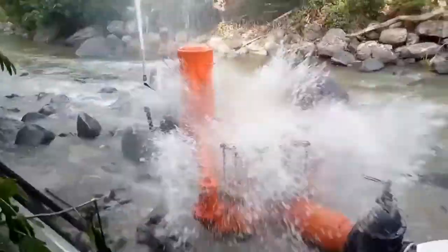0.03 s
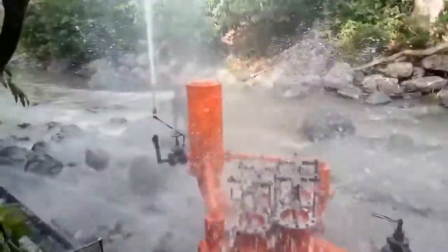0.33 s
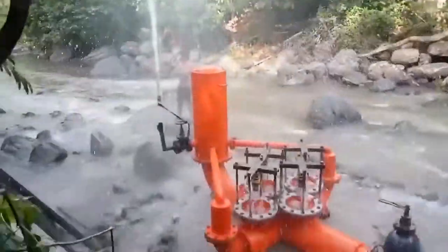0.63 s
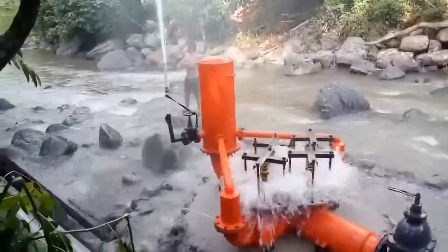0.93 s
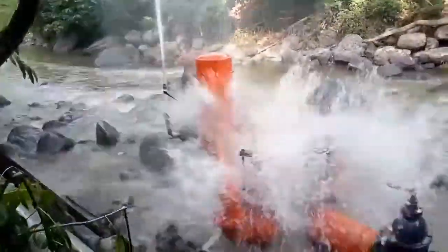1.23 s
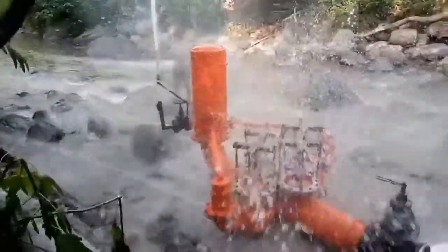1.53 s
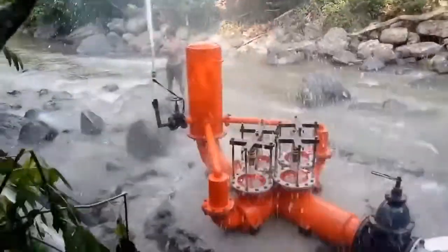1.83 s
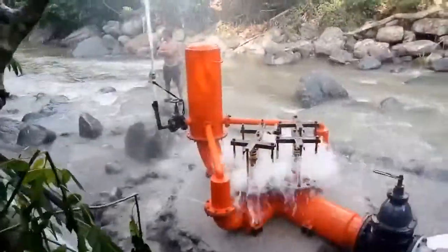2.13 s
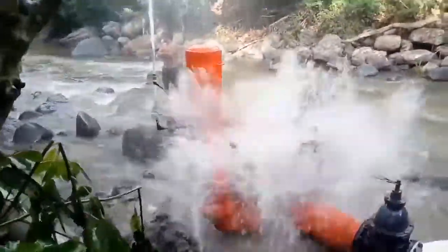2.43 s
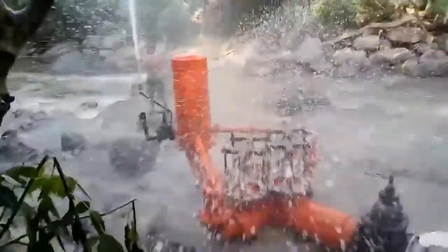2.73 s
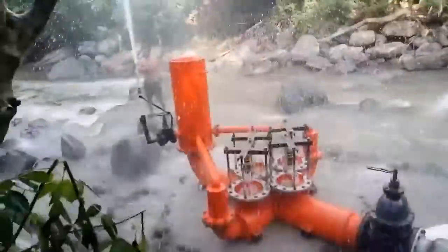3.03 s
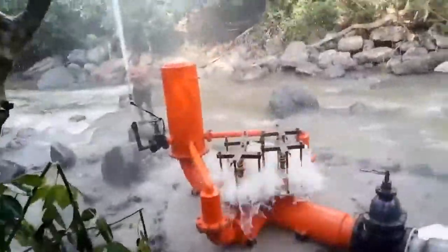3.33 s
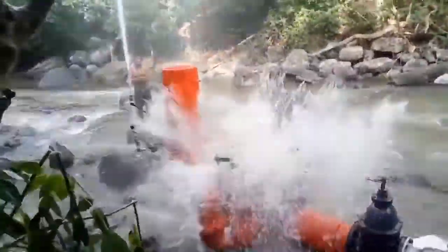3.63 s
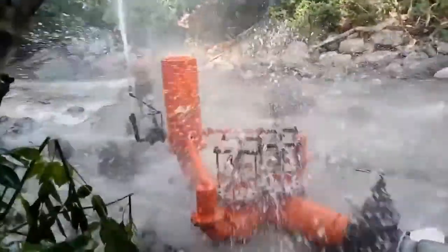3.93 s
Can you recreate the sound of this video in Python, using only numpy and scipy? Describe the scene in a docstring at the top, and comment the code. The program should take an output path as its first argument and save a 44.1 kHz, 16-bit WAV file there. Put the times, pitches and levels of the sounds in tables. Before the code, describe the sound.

Water gushes and hisses from a ram pump whose valves slam shut in a steady cycle.

```python
"""Gushing water surges into a steel slam: a big hydraulic ram pump, cycling about every 1.2 s.
The jets from its open waste valves swell as they close; the plate hits its seat and rings the body.
The water column recoils, the valves clatter open, the drive pipe rumbles and spray rains down.
A river rushes behind it. Gain control ducks the level at each slam."""
import sys
import numpy as np
from scipy import signal
from scipy.fft import rfft, irfft, next_fast_len
from scipy.io import wavfile
from scipy.ndimage import uniform_filter1d, map_coordinates

SR = 44100
rng = np.random.default_rng(int(sys.argv[2]) if len(sys.argv) > 2 else 0)


def file_out(sig):
    """Save sig as 16-bit WAV at sys.argv[1]."""
    # one column per channel
    cols = np.atleast_2d(sig).T
    # limit, then scale
    lim = np.clip(cols, -1, 1)
    pcm = np.round(lim * 32767).astype(np.int16)
    wavfile.write(sys.argv[1], SR, pcm)


N = 176400
T = np.arange(N) / SR

# Valve closures. Each row: start in seconds, slam and surge levels in relative dB,
# rebound lag in seconds, rebound level in dB against the slam.
CLOSURES = [(0.184, -11.5, -15, 0.0048, -7), (1.3940, -12.5, -13, 0.0049, -1),
            (2.6037, -12.5, -14.5, 0.00657, -7), (3.8131, -12, -12.5, .0078, -3)]
# Valve plate modes. Each row: frequency in Hz, level in dB, T60 in seconds.
PLATE_MODES = [(221, -15.5, 0.078), (407, -13.5, 0.029), (559, 0.5, 0.032), (958, -3.5, 0.058),
               (1060, -7, 0.022), (1222, -10, 0.032), (1528, -15.5, 0.091), (2017, -14.5, 0.05)]
# Water hammer and wash spectra. Each row: frequency in Hz, level in dB.
HAMMER_SPECTRUM = [(50, -54), (120, -35), (200, 8), (300, -43), (560, -26.5), (720, -9), (1000, 1),
                   (1500, 3.5), (2100, -5), (3000, -1), (9000, -34)]
WASH_SPECTRUM = [(150, -9), (400, 7), (600, -12), (800, 0), (1050, 4), (1400, -11), (3000, -39)]

def slams(chatter_s=0.011, chatter_db=-11, tick_loss_db=1):
    """The plate hits its seat, rebounds and chatters, with water hammer and a fading wash."""
    contacts = []
    for s, db, _, lag_s, rebound_db in CLOSURES:
        ticks_s = s + lag_s + chatter_s * np.cumsum(1 + 0.158 * rng.uniform(-1.03, 1, size=5))
        contacts += [(s, db), (s + lag_s, db + rebound_db)]
        contacts += [(tick, db + chatter_db - tick_loss_db * k) for k, tick in enumerate(ticks_s)]
    plate = amp(5) * struck(PLATE_MODES, contacts, attack_s=0.00023)
    hammer = sum(amp(db - 5) * burst(s + 0.0055, 0.0056, 0.15) for s, db, *_ in CLOSURES)
    wash = sum(amp(db - 17) * burst(s + 0.006, 0.026, 0.74) for s, db, *_ in CLOSURES)
    return plate + hammer * rush(HAMMER_SPECTRUM) + wash * patter(WASH_SPECTRUM, per_s=990)


# Closing surge spectrum. Each row: frequency in Hz, level in dB.
SURGE_SPECTRUM = [(40, -30), (90, -4), (125, -5), (180, -6.5), (240, 1), (340, 2), (460, 5), (650, -1),
                  (1000, -2.5), (2000, -3), (5000, -16)]
# Seating knock modes. Each row: frequency in Hz, level in dB, T60 in seconds.
SEATING_MODES = [(226.5, 2.5, 0.093), (337, -4.5, 0.066), (470, 2, 0.06)]

def surge(lead_s=0.017, knock_lead_s=0.0205, t60_s=0.23):
    """Jets swell as the valves close; water squeezes through the gap with a low knock."""
    jet_hz_db = [(200, -49), (500, -3), (1000, 4.5), (2200, 0.5), (6000, -50)]
    jets = amp(-32) * sum(burst(s - lead_s, 1.0, t60_s) for s, *_ in CLOSURES)
    swell = sum(amp(db - 4.5) * burst(s - lead_s, 0.026, t60_s) for s, _, db, *_ in CLOSURES)
    seatings = [(s - knock_lead_s, db - 1) for s, _, db, *_ in CLOSURES]
    knock = struck(SEATING_MODES, seatings, attack_s=0.0028)
    return jets * rush(jet_hz_db, patchy_db=7) + swell * rush(SURGE_SPECTRUM, patchy_db=3.5) + knock


# Recoil blows. Each row: time in seconds, relative level in dB, rise in seconds,
# rattle T60 in seconds, bass offset in dB.
RECOIL_BLOWS = [(.556, -26.5, 0.012, 0.24, 8.5), (0.615, -14.5, 0.026, 0.24, 2),
                (.639, -18, 0.022, 0.18, 3), (0.749, -23.5, 0.11, 0.092, -5), (1.774, -24, 0.019, 0.11, 3),
                (1.822, -18, 0.044, 0.29, -1), (1.843, -16.5, 0.034, 0.22, 1), (1.866, -24.5, .012, .15, 9),
                (1.954, -24, 0.055, 0.1, -1), (2.972, -24, 0.02, 0.059, 3.5),
                (3.023, -19.5, 0.034, .15, -5), (3.037, -20, 0.015, .12, 4), (3.051, -16.5, 0.026, 0.2, 2),
                (3.081, -28.5, .012, 0.19, 8), (3.157, -28, 0.072, 0.13, -2.5),
                (3.977, -24.5, 0.051, .12, -16)]
# Pipe knock modes. Each row: frequency in Hz, level in dB, T60 in seconds.
PIPE_MODES = [(181.3, 1, 0.12), (346.4, -7.5, 0.14), (456, -3, 0.069)]
# Rattle and thud spectra. Each row: frequency in Hz, level in dB.
RATTLE_SPECTRUM = [(200, -46), (330, -22), (460, -11), (560, -9), (700, -6.5), (900, -4.5), (1100, -3),
                   (1300, -8.5), (1600, -5), (2200, -10), (4000, -13.5), (9000, -19.5)]
THUD_SPECTRUM = [(40, -35), (80, -9), (125, -9), (190, -1), (240, 1.5), (300, -6), (360, -10), (450, -0.5),
                 (600, -3.5), (1500, -19)]

def recoil(thud_lag_s=0.0014, thud_t60_ratio=1.55):
    """The column recoils: valves drop open with a clank, a pipe knock, a rattle and a dull thud."""
    rattle_power = thud_power = 0
    clanks, knocks = [], []
    for s, db, rise_s, t60_s, bass_db in RECOIL_BLOWS:
        rattle_power += (amp(db) * burst(s, rise_s, t60_s)) ** 2
        thud_shape = burst(s + thud_lag_s, rise_s, t60_s * thud_t60_ratio)
        thud_power += (amp(db + bass_db - 9) * thud_shape) ** 2
        clanks.append((s, db - 3))
        knocks.append((s, db + bass_db - 3))
    clank = struck(PLATE_MODES, clanks, attack_s=0.001)
    knock = struck(PIPE_MODES, knocks, attack_s=0.002)
    rattle = amp(-1 + 0.44 * wobble(150)) * np.sqrt(rattle_power) * rush(RATTLE_SPECTRUM)
    thud = np.sqrt(thud_power) * rush(THUD_SPECTRUM, patchy_db=-1)
    return clank + knock + rattle + thud


# Stem drops. Each row: start in seconds, pitch in Hz, level in dB, T60 in seconds.
STEM_DROPS = [(0.612, 1120, -2.5, 0.029), (1.844, 886, -12, 0.075), (1.849, 665, -10, 0.032),
              (1.943, 1070, -24, 0.18), (2.745, 860, -23, 0.17), (3.050, 1006, -7, .04),
              (3.145, 1650, -24, 0.14)]

def stem_clinks(attack_s=0.0043, jitter_rad=0.27):
    """Valve stems drop with short, unsteady metallic notes."""
    out = np.zeros(N)
    for s, hz, db, t60_s in STEM_DROPS:
        t = np.maximum(T - s, 0)
        envelope = amp(db - 60 * t / t60_s) * (1 - np.exp(-t / attack_s))
        out += envelope * np.sin(2 * np.pi * hz * t + jitter_rad * wobble(250))
    return out


# Steel body modes. Each row: frequency in Hz, level in dB, T60 in seconds.
BODY_MODES = [(475, 0, 0.5), (594, -1.5, 0.46), (851, -3, 0.54), (930, 1.5, 0.41), (949, 2.5, 0.41),
              (1018, -5, 0.69), (1472, -6, 0.77), (2220, -5, 0.6)]

def body_ring(level_db=-36, recoil_db=-6):
    """The steel body rings on, wide in stereo, after every slam and recoil blow."""
    blows = [(s, db) for s, db, *_ in CLOSURES] + [(s, db + recoil_db) for s, db, *_ in RECOIL_BLOWS]
    stereo_pair = [struck(BODY_MODES, blows, attack_s=0.018, scatter=0.00483) * amp(1.8 * wobble(40))
                   for _ in range(2)]
    return amp(level_db) * spread(np.array(stereo_pair), np.ones_like)


# Valve outflow, in three runs. Each row: time in seconds, gush and mist levels in relative dB.
OUTFLOW = [
    [(0.33, -28.5, -27.5), (0.4, -27.5, -29.5), (0.57, -27.5, -27.5), (0.658, -28, -31.5),
     (0.696, -26.5, -26.5), (1.072, -29, -28), (1.36, -27, -27)],
    [(1.55, -29.5, -28), (1.676, -26.5, -26), (1.72, -28.5, -28), (1.802, -26.5, -27),
     (2.068, -28.5, -26.5), (2.56, -27.5, -27.5), (2.57, -30.5, -29.5)],
    [(2.76, -29.5, -28), (2.972, -27, -28.5), (3.026, -27.5, -31), (3.332, -29, -27), (3.358, -30.5, -28.5),
     (3.384, -28.5, -27), (3.78, -29, -28)],
]
# Gush and mist spectra. Each row: frequency in Hz, level in dB.
GUSH_SPECTRUM = [(800, -55), (1800, -14.5), (2600, -4), (3600, -0.5), (5000, 0), (6500, 0.5), (7400, -4),
                 (8100, -10), (10000, -6), (16000, -18)]
MIST_SPECTRUM = [(6000, -40), (8200, -8.5), (9000, -5), (10200, -2), (11200, 4), (12200, 2.5), (12900, -1),
                 (14300, -0.5), (14800, 5), (15800, -7.5)]

def valve_gush():
    """Water churns out of the waste valves, with drops and a hiss of fine mist."""
    times_s, *levels = np.transpose(np.concatenate(OUTFLOW))
    gush_db, mist_db = [np.interp(T, times_s, level) for level in levels]
    churn_db = 0.55 * wobble(21.05)
    gush = amp(gush_db + 6 + churn_db + 0.71 * wobble(11)) * rush(GUSH_SPECTRUM)
    drops = amp(gush_db - 4) * patter(GUSH_SPECTRUM, per_s=410)
    mist = amp(mist_db + 5.5 + churn_db + 0.38 * wobble(7.8)) * rush(MIST_SPECTRUM)
    return gush + drops + mist


def falling_spray(delay_s=0.25, rise_s=0.53, t60_s=0.96, level_db=-31):
    """Water thrown up by each slam rains back down."""
    rain_hz_db = [(200, -21), (450, -15), (800, -1), (2000, 1), (6000, -17), (12000, -26)]
    shower = sum(burst(s + delay_s, rise_s, t60_s) for s, *_ in CLOSURES)
    return amp(level_db) * shower * patter(rain_hz_db, per_s=2000)


# Column swings. Each row: peak in seconds after the slam, level in dB, rise and T60 in seconds.
COLUMN_SWINGS = [(.17, -39.5, 0.24, 0.99), (.44, -31, 0.24, 1)]
# Rumble offset in dB, one per cycle.
CYCLE_RUMBLE_DB = [-1.5, -2.5, 1.5, 2]
# Drive pipe spectrum. Each row: frequency in Hz, level in dB.
RUMBLE_SPECTRUM = [(30, -33), (60, -34), (85, -27), (120, 6), (160, -4.5), (230, -3), (320, -30),
                   (800, -21)]

def pipe_rumble():
    """The drive pipe rumbles twice a cycle as the water column swings back and forth."""
    power = 0
    for (s, *_), cycle_db in zip(CLOSURES, CYCLE_RUMBLE_DB):
        for delay_s, db, rise_s, t60_s in COLUMN_SWINGS:
            power += (amp(db + cycle_db) * burst(s + delay_s, rise_s, t60_s)) ** 2
    return amp(0.55 * wobble(49)) * np.sqrt(power) * rush(RUMBLE_SPECTRUM, patchy_db=-5)


# Current and splash spectra. Each row: frequency in Hz, level in dB.
CURRENT_SPECTRUM = [(25, -9), (55, -16), (90, -5), (130, -2), (240, 0.5), (300, -3), (450, 1), (900, 0.5),
                    (1600, -11.5), (4000, -11), (10000, -25)]
SPLASH_SPECTRUM = [(300, -17), (700, -10), (1400, 35.5), (2500, 40), (5000, -80), (10000, -69)]

def river(ebb_delay_s=0.81, ebb_half_width_s=0.24):
    """The river rushes and splashes on rocks; the sound ebbs once the spray has fallen."""
    ebb_db = -7 * sum(np.exp(-((T - s - ebb_delay_s) / ebb_half_width_s) ** 2) for s, *_ in CLOSURES)
    current = amp(-34.5 + 0.29 * ebb_db + 0.071 * wobble(27.6)) * rush(CURRENT_SPECTRUM)
    splash = amp(-35.5 + ebb_db + 1.5 * wobble(18)) * patter(SPLASH_SPECTRUM, per_s=2800)
    return current + splash


def struck(modes, blows, attack_s, scatter=0.029):
    """Damped modes rung by (seconds, dB) blows; level and tuning vary per blow."""
    out = np.zeros(N + SR)
    t = np.arange(SR // 2) / SR
    onset = 1 - np.exp(-t / attack_s)
    for s, db in blows:
        for k, (hz, mode_db, t60_s) in enumerate(modes):
            jitter_db, detune = rng.standard_normal(2)
            decay = amp(db + mode_db + jitter_db - 60 * t / t60_s)
            tone = (-1) ** k * np.sin(2 * np.pi * hz * (1 + scatter * detune) * t)
            out[round(s * SR):][:len(t)] += onset * decay * tone
    return signal.sosfilt(signal.butter(2, 130, "high", fs=SR, output="sos"), out[:N])


def rush(spectrum, patchy_db=2.5):
    """Turbulent stereo noise, with random gain patches in time and frequency."""
    bins = signal.stft(rng.standard_normal((2, N)), nperseg=1024)[2]
    patches = uniform_filter1d(rng.standard_normal(bins.shape[1:]), size=3, axis=0)
    patches = uniform_filter1d(patches, size=5, axis=1)
    pair = signal.istft(bins * amp(patchy_db * unit(patches)), nperseg=1024)[1][:, :N]
    return spread(pair, lambda hz: amp(along(spectrum, hz)))


def patter(spectrum, per_s):
    """Two streams of tiny random impacts, mixed to stereo."""
    hits = (rng.random((2, N)) < per_s / SR) * rng.standard_normal((2, N))
    return spread(hits, lambda hz: amp(along(spectrum, hz)))


# Stereo width. Each row: frequency in Hz, left-right correlation.
CORRELATION = [(40, 0.71), (130, 1), (300, 0.94), (600, 0.75), (950, 0.33), (1500, 0.08), (2400, -0.041),
               (6000, 0.007), (15000, 0.15)]

def spread(pair, response):
    """Colour two unrelated signals into stereo of rms 1: bass centred, treble wide."""
    def mid_side_gains(hz):
        angle = np.arccos(np.clip(along(CORRELATION, hz), -1, 1)) / 2
        return response(hz) * np.array([np.cos(angle), np.sin(angle)])
    mid, side = filtered(pair, mid_side_gains)
    return unit(np.array([mid + side, mid - side]))


def burst(peak_s, rise_s, t60_s):
    """Envelope: up 20 dB per rise_s, then down 60 dB per t60_s."""
    return amp(np.minimum(20 * (T - peak_s) / rise_s, -60 * (T - peak_s) / t60_s))


def wobble(knots_per_s):
    """Smooth random curve."""
    return map_coordinates(rng.standard_normal(1024), [T * knots_per_s], mode="wrap")


def filtered(x, response):
    """Apply the gain response(hz)."""
    size = next_fast_len(N + SR // 2)
    return irfft(rfft(x, size) * response(np.fft.rfftfreq(size, 1 / SR)), size)[..., :N]


def along(points, hz):
    """Interpolate (Hz, value) points on a log axis."""
    knots_hz, values = np.transpose(points)
    return np.interp(np.log(hz + 1), np.log(knots_hz + 1), values)


def amp(db):
    """Decibels to gain."""
    return 10 ** (np.asarray(db) / 20)


def unit(x):
    """Scale to rms 1."""
    return x / np.sqrt(np.mean(x ** 2) + 1e-20)


# Stereo balance. Each row: frequency in Hz, left minus right in dB.
BALANCE = [(60, -3), (130, -0.5), (290, -0.5), (640, -2), (1410, -1.0), (3100, 0.5), (6820, 0.0),
           (15000, -3)]

def scene():
    """Water and pump, balanced left to right."""
    water = valve_gush() + river() + falling_spray()
    pump = surge() + slams() + body_ring() + recoil() + stem_clinks() + pipe_rumble()
    return filtered(water + pump, lambda hz: amp(along(BALANCE, hz) * np.array([[0.5], [-0.5]])))


def record(dry):
    """Gain control ducks after loud blows and recovers slowly; peaks are rounded, the top is cut."""
    threshold_db, slope, attack_s, release_db_per_s = -17, 0.65, 0.016, 29
    ceiling, top_hz = 0.9, 15900
    power = uniform_filter1d(np.mean(dry ** 2, axis=0), size=500)
    level_db = 10 * np.log10(np.abs(power) + 1e-12)
    cut_db = slope * np.maximum(level_db - threshold_db, 0)
    held_db = np.maximum.accumulate(cut_db + release_db_per_s * T) - release_db_per_s * T
    pole = np.exp(-1 / (attack_s * SR))
    ducked = dry * amp(-signal.lfilter([1 - pole], [1, -pole], held_db))
    rounded = ducked / (1 + (ducked / ceiling) ** 6) ** (1 / 6)
    return filtered(rounded, lambda hz: hz < top_hz)


dry = scene()
out = record(dry)
file_out(out)
```